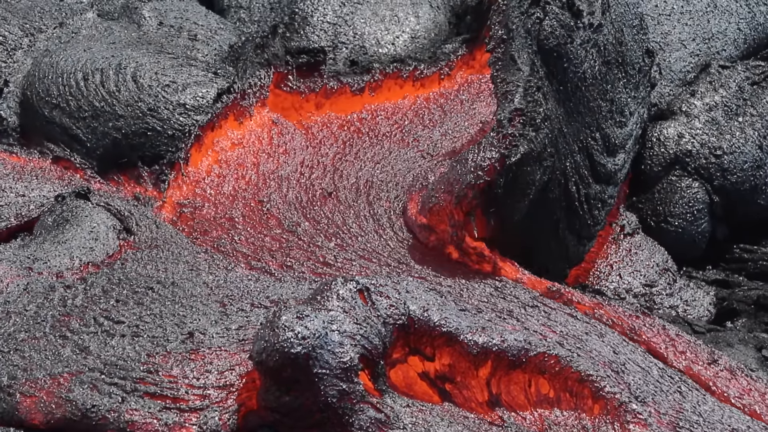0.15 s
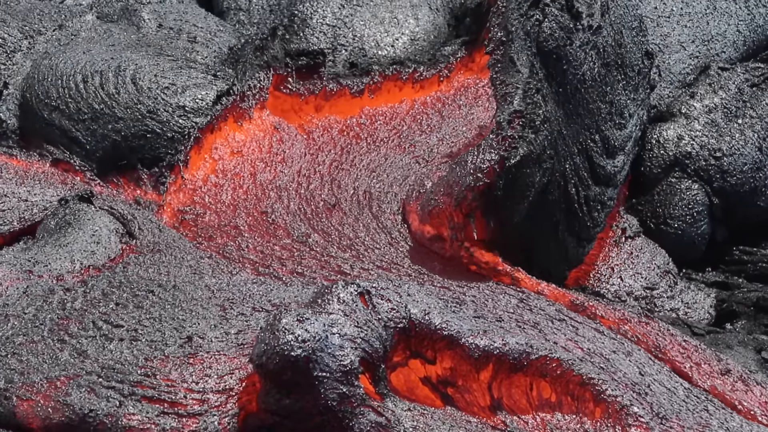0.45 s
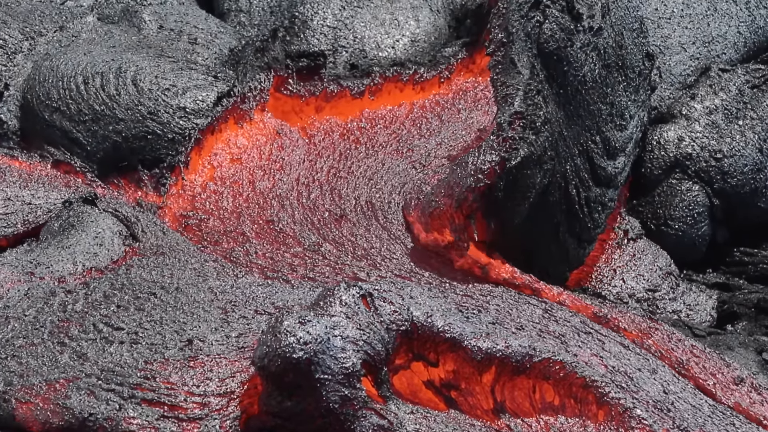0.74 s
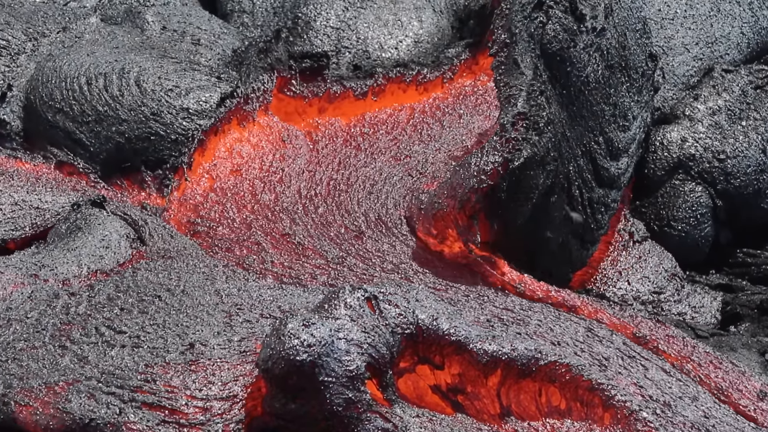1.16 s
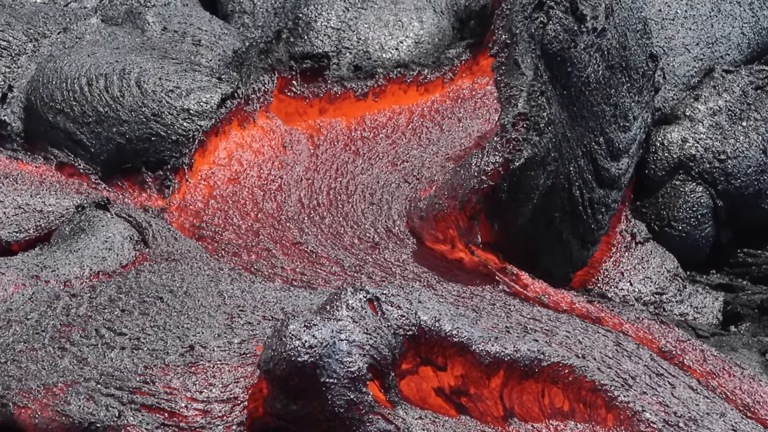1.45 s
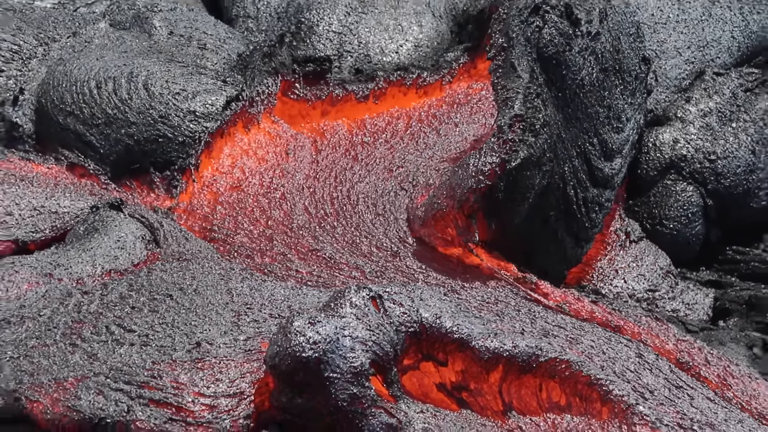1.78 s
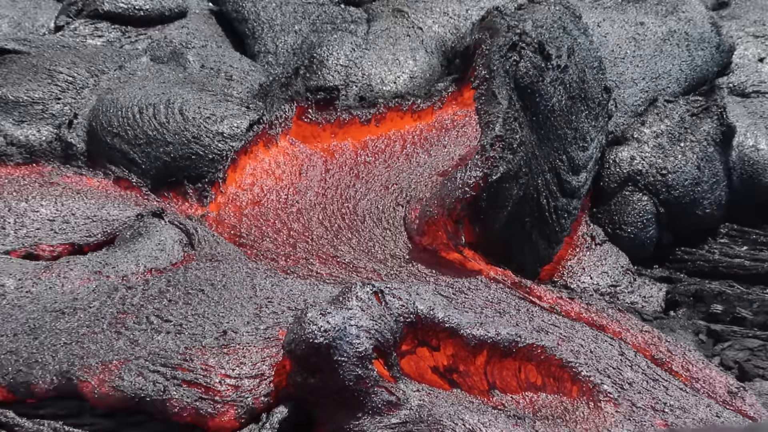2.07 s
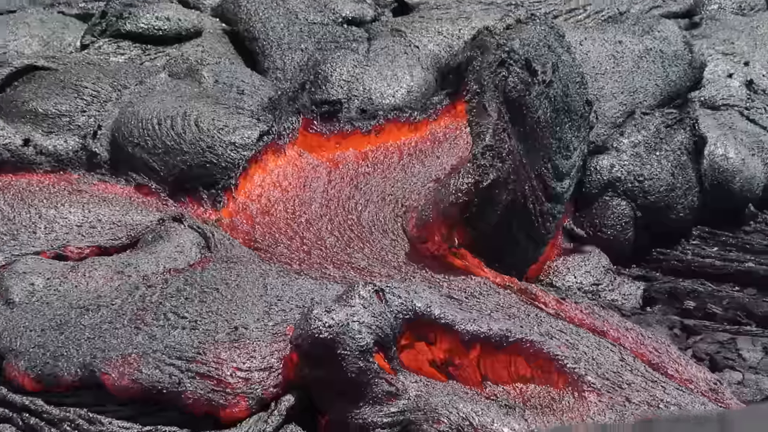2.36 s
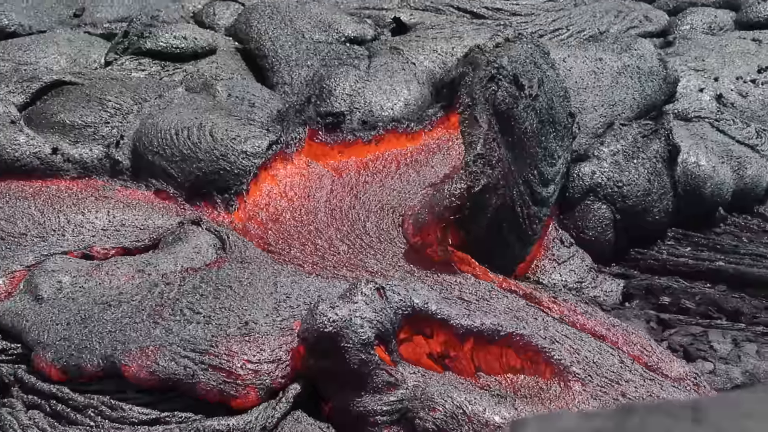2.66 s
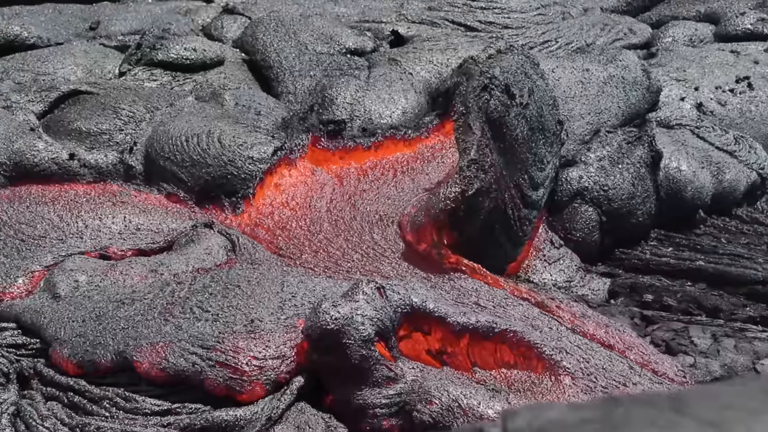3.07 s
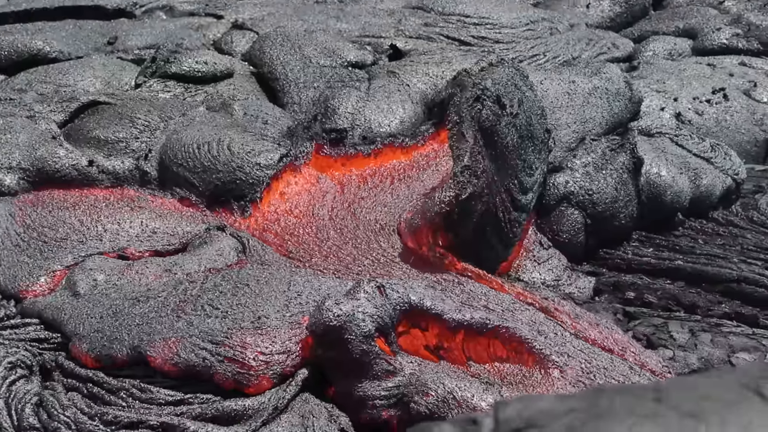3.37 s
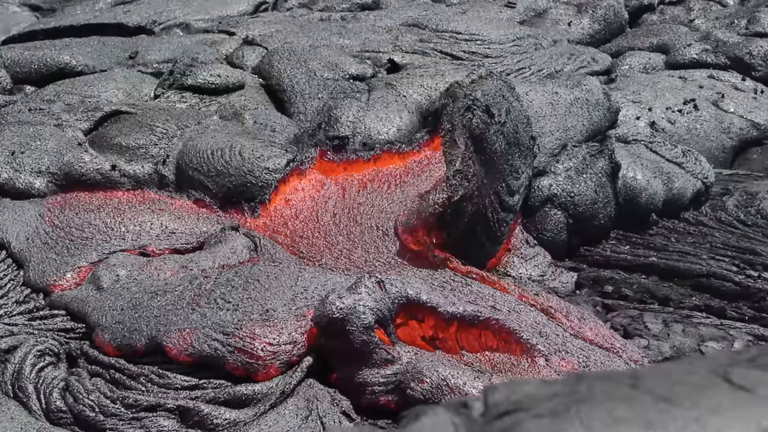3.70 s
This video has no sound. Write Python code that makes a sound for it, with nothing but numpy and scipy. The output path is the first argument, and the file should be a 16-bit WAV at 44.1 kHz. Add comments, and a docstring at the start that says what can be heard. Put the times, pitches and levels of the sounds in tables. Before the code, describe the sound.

Sharp brief crackles from cooling lava, with faint sizzle, amid low rumbling wind thumps

```python
"""Gusty wind rumbles on the microphone, and single eddies strike it as short, dull buffets.
Under it a lava flow cools in the open air: a fine sizzle of flakes, sharp crust snaps, crumbling grains.
Wind is filtered noise whose level flutters; a buffet is a brief pressure pulse mixed with a noise puff.
Snaps, ticks and grains are minimum-phase clicks with a decaying noise tail; the sizzle adds a hiss."""
import sys
import numpy as np
from scipy import signal
from scipy.fft import rfft, irfft
from scipy.io import wavfile

SR = 44100
rng = np.random.default_rng(int(sys.argv[2]) if len(sys.argv) > 2 else 0)


def dump_mix(stems):
    """Bounce the given channels to the path in sys.argv[1] as a 16-bit WAV at rate SR."""
    frames = np.atleast_2d(stems).T  # one column per channel
    limited = np.clip(frames, -1, 1)  # hard clip at full scale
    pcm = np.round(limited * 32767).astype(np.int16)
    wavfile.write(sys.argv[1], SR, pcm)


N = 168903  # length [samples]

# Wind: level trims, then how fast and how deep the turbulence flutters
RUMBLE_DB, RUSH_DB = 3.5, 1
EDDY_HZ, RUMBLE_EDDY_DB, RUSH_EDDY_DB = 41.3, 2, 2

# Buffets: level trims
THUMP_DB, BODY_DB, RASP_DB = -0.5, -1.5, 1.5
# Even the briefest eddy has the energy of some milliseconds; its rasp is shorter by a factor
BUFFET_SPREAD_S, RASP_SHORTER = 0.0055, 0.66
RASP_OCTAVES_PER_DB, RASP_USUAL_DB = 0.02, -19  # harder eddies rasp higher
CORE_S, RASP_CORE_S = 0.0091, 0.0036  # eddies shorter than this are mostly one clean pressure pulse
OVERLOAD, OVERLOAD_HZ = 0.76, 3000  # limiting amplitude, and top of the flattening

# Snaps: level trim, and the duration that sets a click's energy
SNAP_DB, SNAP_S = 2, 0.00025
SLAB_TOP_HZ, FLAKE_BODY_DB = 4000, -20.5  # the body rolls off above this; tiny flakes have little
# Tails of a click: energy level and time to decay by 60 dB
RING_DB, RING_T60_S = -8.5, 0.0013
SCATTER_DB, SCATTER_T60_S = -19, 0.025  # nearby rock scatters the snap
FAR_DB, FAR_T60_S = -49.5, 0.091
EDGE_HZ = 16400  # upper band limit of clicks and microphone

# Sizzle
TICKS_PER_S, TICK_DB, TICK_SPREAD_DB, TICK_RANGE_DB = 550, -62, 3.5, 14.5
TICK_OCTAVES, TICK_LOW_HZ, TICK_HIGH_HZ = 0.17, 7100, 15400
TICK_FOLLOW = 0.74  # dB of tick level per dB of hiss level
FIZZ_DB, FIZZ_FLICKER_HZ, FIZZ_FLICKER_DB = -0.5, 200, 2

# Crumbling: grain rate and pitch spread, then the onset time of a spray
GRAINS_PER_S, GRAIN_OCTAVES = 3300, 0.73
CRUMBLE_RISE_S = 0.0013


def amp(db):
    """Amplitude gain from a level: 20 dB for each factor of ten."""
    return 10 ** (np.asarray(db) / 20)


def unit(x):
    """Power normalisation: scales to an rms of 1."""
    return x / np.sqrt(np.mean(x ** 2) + 1e-20)


def packet(x, seconds):
    """Energy normalisation: scales to the energy of a signal of rms 1 that lasts so long."""
    return x * np.sqrt(seconds * SR / (np.sum(x ** 2) + 1e-20))


def add(mix, s, sound):
    """Linear superposition: mixes a sound in from time s, in seconds."""
    at = round(s * SR)
    sound = sound[max(-at, 0):]
    part = mix[max(at, 0):][:len(sound)]
    part += sound[:len(part)]


def curve(table):
    """Linear interpolation: each column of a timed table, sample by sample."""
    s, *columns = np.transpose(table)
    return [np.interp(np.arange(N) / SR, s, c) for c in columns]


def colour(x, spectrum):
    """Zero-phase filtering: weights each frequency by a spectrum of (Hz, dB) points."""
    hz, db = np.transpose(spectrum)
    f = np.fft.rfftfreq(len(x), 1 / SR)
    level = np.interp(np.log(f + 1), np.log(hz), db)
    return irfft(rfft(x) * amp(level), len(x))


def flutter(hz):
    """Band-limited random modulation: noise above hz / 10 that rolls off past hz, at an rms of 1."""
    f = np.fft.rfftfreq(N, 1 / SR)
    response = (f > hz / 10) / (1 + (f / hz) ** 2) ** 2
    return unit(irfft(rfft(rng.standard_normal(N)) * response, N))


def wind():
    """Turbulence noise: a rumble and a higher rush, both level-modulated by the same eddies."""
    # Steady wind: (time [s], rumble level before trim [dB], rush level before trim [dB])
    wind_levels = [(0, -26, -41.5), (.3, -20.5, -36), (.45, -26, -41.5), (.7, -22.5, -43), (.81, -30, -47),
                   (.95, -23.5, -49.5), (1.04, -27.5, -57), (1.2, -28.5, -58), (1.42, -37, -50),
                   (1.58, -26.5, -45.5), (1.74, -23, -44.5), (1.96, -27.5, -44.5), (2.08, -37, -45.5),
                   (2.17, -23.5, -43), (2.55, -30, -48), (2.76, -24.5, -44.5), (3.05, -28.5, -42.5),
                   (3.29, -29.5, -47.5), (3.42, -21.5, -44.5), (3.55, -26, -59), (3.82, -22, -45)]
    # Shapes of the rumble and the rush: (frequency [Hz], relative level [dB])
    rumble_spectrum = [(10, -12.5), (25, -14.5), (60, -1.5), (150, 0), (230, -5.5), (400, -15), (700, -24),
                       (1500, -37.5), (4000, -66), (9000, -68.5)]
    rush_spectrum = [(100, -20), (400, -2), (750, -1), (1150, -1), (1500, -9), (2100, -15), (3200, -21),
                     (5000, -31), (9000, -50)]

    rumble_db, rush_db = curve(wind_levels)
    eddies = flutter(EDDY_HZ)
    rumble = unit(colour(rng.standard_normal(N) * amp(RUMBLE_EDDY_DB * eddies), rumble_spectrum))
    rush = unit(colour(rng.standard_normal(N) * amp(RUSH_EDDY_DB * eddies), rush_spectrum))
    return amp(rumble_db + RUMBLE_DB) * rumble + amp(rush_db + RUSH_DB) * rush


def eddy(t, length, spectrum, core_s):
    """Coherent and turbulent pressure: a pulse of random phase and a noise puff share the energy."""
    impulse = signal.hilbert(1. * (t == 0))
    pulse = colour((impulse * np.exp(2j * np.pi * rng.random())).real, spectrum)
    envelope = 2 ** (-(2 * t / length) ** 2 / 2)  # half power at length / 2 either side
    puff = colour(rng.standard_normal(len(t)) * envelope, spectrum)
    share = np.exp(-(length / core_s) ** 2)  # energy in the pulse
    mixed = np.sqrt(share) * unit(pulse) + np.sqrt(1 - share) * unit(puff)
    return packet(mixed, np.hypot(length, BUFFET_SPREAD_S))


def buffets(size=4096):
    """Transient wind pressure: each eddy is a thump, a body and a rasp that brightens with its level."""
    # Eddies striking the microphone: (time of centre [s], length [s],
    # thump level before trim [dB], body level before trim [dB], rasp level before trim [dB])
    strikes = [(.007, 0.011, -24.5, -22.5, -26.5), (0.084, 0.0058, -17, -14, -25.5),
               (0.306, 0.016, -12, -15.5, -32), (0.326, 0.0092, -13, -13, -21),
               (0.341, 0.0088, -16, -9.5, -20.5), (0.358, 0.012, -8.5, -14, -21.5),
               (0.65, 0.0069, -8, -12.5, -30.5), (0.682, 0.0066, -14, -21, -39),
               (0.693, 0.0049, -8, -7.5, -23.5), (.697, 0.0036, -18, -21, -26.5),
               (0.725, 0.02, -16.5, -18.5, -32.5), (0.739, 0.0034, -10, -6, -22.5),
               (0.7452, 0.0028, -23, -17, -27), (0.752, 0.0051, -19, -17, -25),
               (0.762, 0.0039, -16.5, -12, -27.5), (0.779, 0.0047, -6, -3.5, -29),
               (0.836, 0.0032, -21, -19, -37), (0.855, 0.0058, -17.5, -8.5, -24),
               (0.901, 0.0042, -24, -22.5, -31.5), (.941, .006, -18.5, -18.5, -34),
               (0.98, 0.0056, -5, -12.5, -19), (0.998, 0.0061, -19, -5, -23),
               (1.147, 0.017, -15.5, -17.5, -33.5), (1.197, 0.0089, -25, -21.5, -36),
               (1.234, 0.0035, -17, -24, -39), (1.254, 0.0077, -15, -20, -35.5),
               (1.313, 0.0089, -29, -25, -46), (1.525, 0.0093, -12.5, -15, -48),
               (1.657, 0.014, -18.5, -11, -38), (1.718, 0.011, -9.5, -17, -33),
               (1.801, 0.011, -16, -18, -47), (1.866, 0.011, -13.5, -18, -59),
               (1.941, 0.0071, -25, -31.5, -36.5), (2.302, 0.0087, -23, -19, -35),
               (2.406, .005, -7.5, -8.5, -25.5), (2.487, 0.017, -13, -16, -33.5),
               (2.599, 0.0093, -16.5, -14.5, -52), (2.654, 0.0043, -13.5, -15.5, -47),
               (2.6671, 0.0047, -11, -12, -16), (2.674, 0.0036, -15, -11.5, -27),
               (2.678, 0.0039, -6, -10, -26), (2.775, 0.0068, -29, -13, -38.5),
               (2.827, 0.0059, -18.5, -6.5, -35.5), (2.844, .006, -23, -18.5, -48),
               (2.896, 0.0032, -9, -11, -54), (2.949, 0.008, -11, -12, -34.5),
               (3.155, 0.022, -13, -18, -50), (3.351, 0.016, -13.5, -19, -42),
               (3.393, 0.0057, -10, -11, -34), (3.407, 0.0025, -13, -9, -24),
               (3.412, 0.0059, -22, -6.5, -19), (3.417, .003, -9.5, -6, -34),
               (3.4361, 0.0062, -11, -14, -19.5), (3.4506, 0.0068, -10.5, -4, -19),
               (3.489, 0.0054, -33, -14.5, -18), (3.5119, 0.005, -12, -11.5, -23.5),
               (3.577, 0.0042, -14, -20, -36.5), (3.619, 0.0075, -13, -13.5, -39),
               (3.659, 0.0052, -13.5, -17.5, -29), (3.725, 0.0028, -11.5, -14.5, -22),
               (3.7357, 0.0075, -35, -8.5, -22)]
    # Shapes of thump, body and rasp: (frequency [Hz], relative level [dB]); rasp before its pitch shift
    thump_spectrum = [(15, -29), (45, -10), (90, -3), (160, -0.5), (230, -5.5), (400, -53), (900, -79)]
    body_spectrum = [(60, -48.5), (150, -3), (240, 4), (450, -3.5), (750, -18.5), (1200, -30.5),
                     (3000, -76)]
    rasp_spectrum = [(300, -4), (700, 7), (1080, 4), (1700, -6), (2300, -18.5), (3100, -37.5),
                     (5000, -57.5), (12000, -77)]

    out = np.zeros(N)
    t = (np.arange(size) - size // 2) / SR
    for s, length, thump_db, body_db, rasp_db in strikes:
        brighter = 2 ** (RASP_OCTAVES_PER_DB * (rasp_db - RASP_USUAL_DB))
        shifted = np.multiply(rasp_spectrum, [brighter, 1])
        thump = amp(thump_db + THUMP_DB) * eddy(t, length, thump_spectrum, CORE_S)
        body = amp(body_db + BODY_DB) * eddy(t, length, body_spectrum, CORE_S)
        rasp = amp(rasp_db + RASP_DB) * eddy(t, length * RASP_SHORTER, shifted, RASP_CORE_S)
        add(out, s + t[0], thump + body + rasp)
    return out


def blown(x):
    """Saturation: strong wind pressure flattens at the microphone port, but stays dull."""
    limited = OVERLOAD * np.cbrt(np.tanh((x / OVERLOAD) ** 3))
    lowpass = signal.butter(2, OVERLOAD_HZ, fs=SR, output="sos")
    # Only the low part of the excess is removed, so the flattening adds little treble
    return x - signal.sosfiltfilt(lowpass, x - limited)


def fracture(hz, octaves, body_db, size=512):
    """Minimum-phase impulse: a click with one spectral hump, and a body from the slab behind it."""
    f = np.abs(np.fft.fftfreq(size, 1 / SR)) + 1
    hump = np.exp(-(np.log2(f / hz) / octaves) ** 2 / 2)
    body = amp(body_db) / np.hypot(1, (f / SLAB_TOP_HZ) ** 2)
    band_limits = (1 + (500 / f) ** 2) * (1 + (f / EDGE_HZ) ** 20)
    log_gain = np.log((hump + body) / band_limits + 1e-4)
    # The Hilbert transform of the log gain gives the phase of a causal click
    return np.fft.ifft(np.exp(np.conj(signal.hilbert(log_gain)))).real


def snap(hz, octaves, body_db=FLAKE_BODY_DB, size=6000):
    """Impulsive fracture and scattering: a flake breaks off and rings; rough rock scatters the click."""
    t = np.arange(size) / SR
    click = fracture(hz, octaves, body_db)
    out = np.zeros(size)
    add(out, 0, packet(click, SNAP_S))
    for db, t60 in (RING_DB, RING_T60_S), (SCATTER_DB, SCATTER_T60_S), (FAR_DB, FAR_T60_S):
        tail = rng.standard_normal(size) * amp(-60 * t / t60) * (t > SNAP_S / 2)
        out += amp(db) * packet(signal.fftconvolve(tail, click)[:size], SNAP_S)
    return out


def sizzle(count=24):
    """Random impulse trains: countless tiny flakes; the nearer ones tick, the rest merge into hiss."""
    # Level at which the sizzle is heard, with dips where the treble briefly drops:
    # (time [s], hiss level before trim [dB])
    heard_levels = [(0, -67), (.45, -71.5), (.63, -62.5), (.85, -78), (1.28, -69.5), (1.55, -63.5),
                    (2.15, -59), (2.58, -60), (2.7, -73.5), (2.95, -64.5), (3.15, -61.5), (3.33, -61),
                    (3.46, -76), (3.82, -69.5)]
    # Shape of the hiss: (frequency [Hz], relative level [dB])
    fizz_spectrum = [(1500, -18), (3500, 3.5), (5200, 6.5), (7500, 2), (11000, 4), (15600, 3.5),
                     (16300, -24.5)]

    level, = curve(heard_levels)
    ticks = np.zeros(N)
    for hz in np.geomspace(TICK_LOW_HZ, TICK_HIGH_HZ, count):
        sizes = amp(np.minimum(TICK_SPREAD_DB * rng.exponential(1, N), TICK_RANGE_DB))
        train = sizes * (rng.random(N) < TICKS_PER_S / count / SR)
        ticks += signal.oaconvolve(train, snap(hz, TICK_OCTAVES))[:N]
    flicker = amp(FIZZ_FLICKER_DB * flutter(FIZZ_FLICKER_HZ))
    hiss = unit(colour(rng.standard_normal(N) * flicker, fizz_spectrum))
    tick_gain = amp(TICK_DB + TICK_FOLLOW * (level - level.mean()))
    return amp(level + FIZZ_DB) * hiss + ticks * tick_gain


def crust():
    """Fracture under thermal contraction: the distinct snaps of the shrinking crust."""
    # Crust snaps: (time [s], level before trim [dB], centre frequency [Hz],
    # spread of the hump [octaves], body level against the hump [dB])
    snaps = [(.061, -37, 3430, .83, -20), (.1323, -36.5, 7960, 1.4, -7), (.1798, -38, 11000, 0.78, -22),
             (.3224, -18, 3720, 0.86, -25), (0.6252, -31.5, 5600, 0.66, -8),
             (0.9809, -11.5, 1760, 0.37, -18.5), (1.1592, -5, 10860, 0.35, -14),
             (1.4502, -33, 3800, 0.21, -13), (1.5041, -39.5, 10500, .65, -20),
             (1.7334, -37.5, 4280, .45, -20), (1.8952, -29.5, 10600, 0.44, -20),
             (2.046, -12.5, 3230, 0.52, -25), (2.048, -0.5, 8600, 1.06, -15),
             (2.248, -33.5, 8700, 0.2, -20), (2.3019, -20.5, 6000, 0.94, -15),
             (2.3255, -19.5, 5800, 0.79, -14), (2.3332, -32, 7600, .29, -20),
             (2.3563, -26.5, 7400, .46, -12), (2.4792, -0.5, 11100, 0.45, -8.5),
             (3.301, -38, 10000, 1.2, -16), (3.3916, -26.5, 9200, 0.63, -20)]

    out = np.zeros(N)
    for s, db, hz, octaves, body_db in snaps:
        add(out, s - SNAP_S / 2, amp(db + SNAP_DB) * snap(hz, octaves, body_db))
    return out


def crumbles():
    """Decaying random impulses: patches of crust give way in sprays that start at once and trickle out."""
    # Sprays of grains: (time [s], decay time to 1/e [s], level [dB], centre frequency [Hz])
    sprays = [(0.625, 0.012, -46, 4620), (2.264, 0.041, -47.5, 2500), (2.292, 0.081, -56.5, 8000)]

    out = np.zeros(N)
    for s, length, db, hz in sprays:
        t = np.arange(0, 4 * length, 1 / SR)
        chance = rng.random(SR)[:len(t)]
        size = rng.standard_normal(SR)[:len(t)]
        envelope = np.minimum(t / CRUMBLE_RISE_S, 1) * np.exp(-t / length)
        grains = size * (chance < GRAINS_PER_S / SR) * envelope
        spray = signal.fftconvolve(grains, snap(hz, GRAIN_OCTAVES))
        add(out, s, amp(db) * packet(spray, length))
    return out


def scene():
    """Superposition of lava and wind at one microphone; only the wind saturates."""
    air = blown(wind() + buffets())
    lava = sizzle() + crust() + crumbles()
    return (air + lava)[None]


def record(dry):
    """Transducer response: microphone colour, clipping at full scale, then the band limit."""
    # Microphone colour: (frequency [Hz], gain [dB])
    microphone = [(4200, 0), (5200, -2.5), (6500, 2), (9000, -2), (14500, -3.5), (17000, -10.5)]

    held = np.clip(colour(dry[0], microphone), -1, 1)
    band_limit = signal.firwin(255, EDGE_HZ, window=("kaiser", 9), fs=SR)
    return signal.oaconvolve(held, band_limit, "same")[None]


dry = scene()
out = record(dry)
dump_mix(out)
```